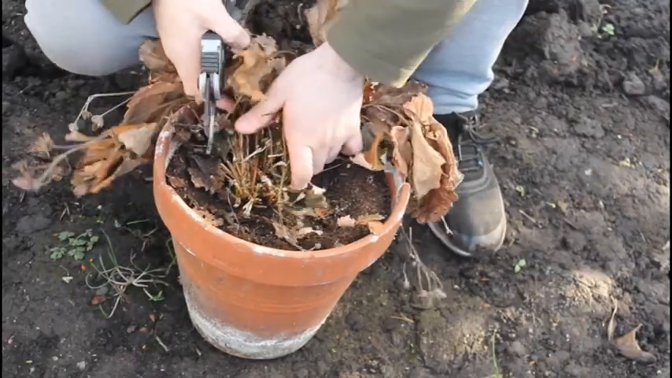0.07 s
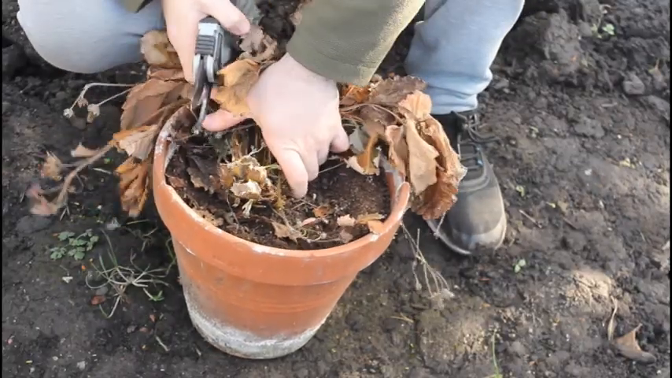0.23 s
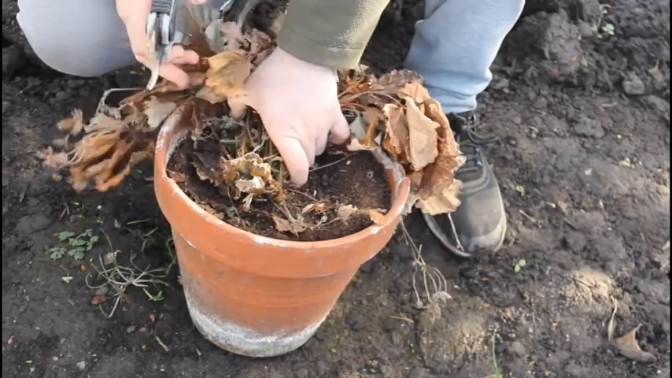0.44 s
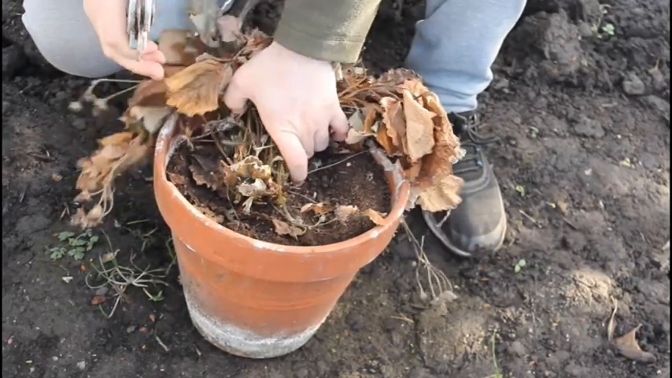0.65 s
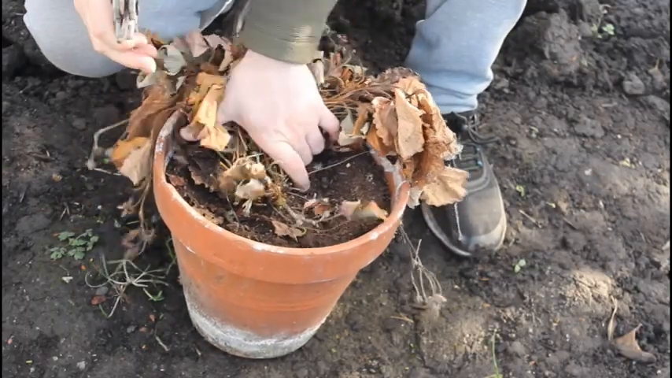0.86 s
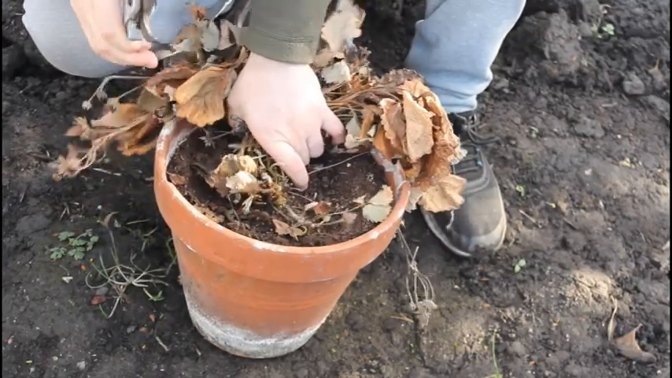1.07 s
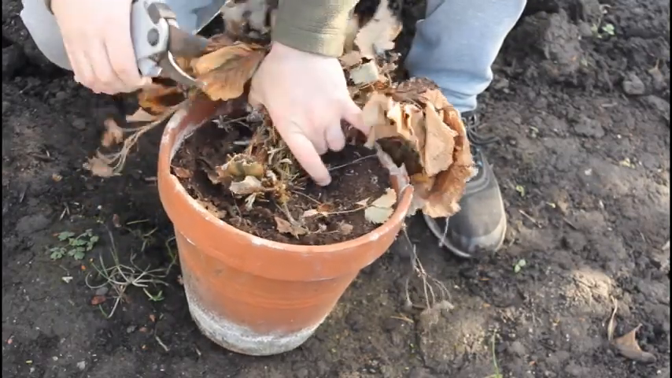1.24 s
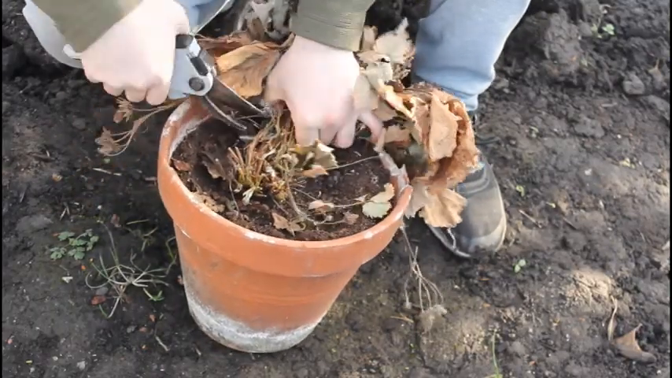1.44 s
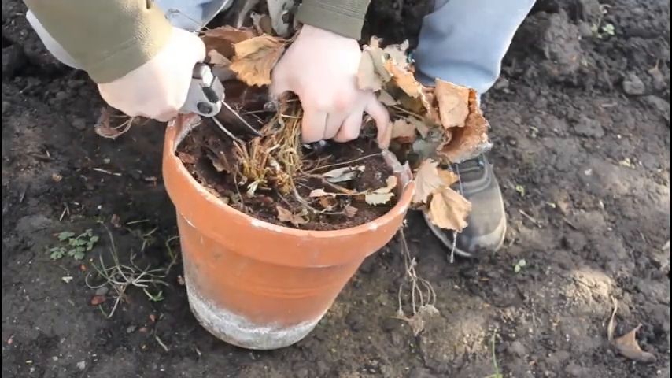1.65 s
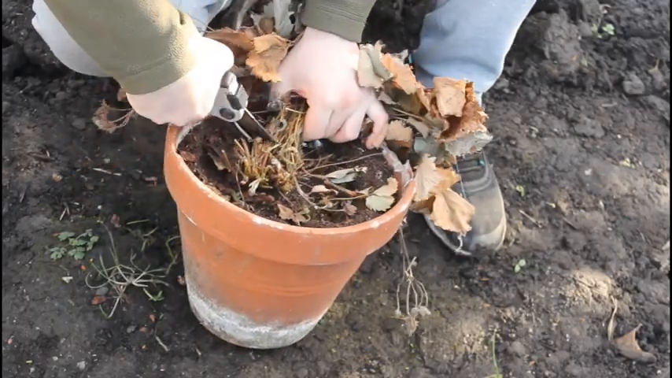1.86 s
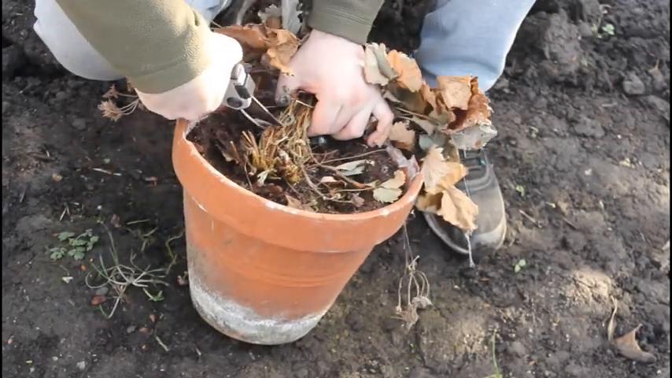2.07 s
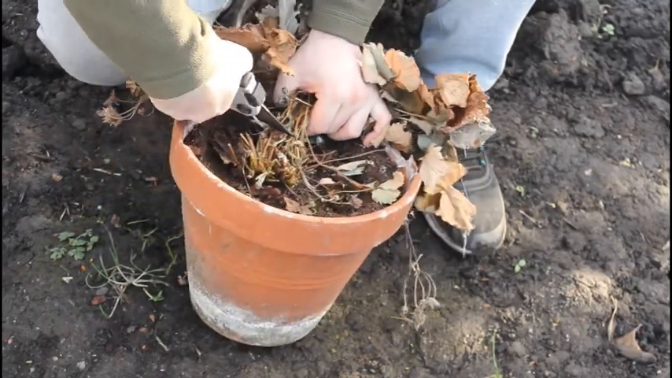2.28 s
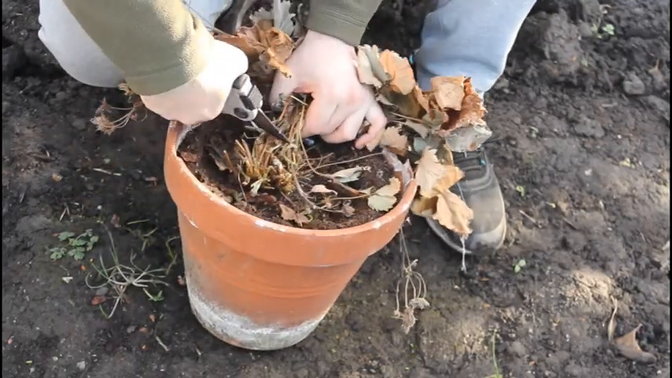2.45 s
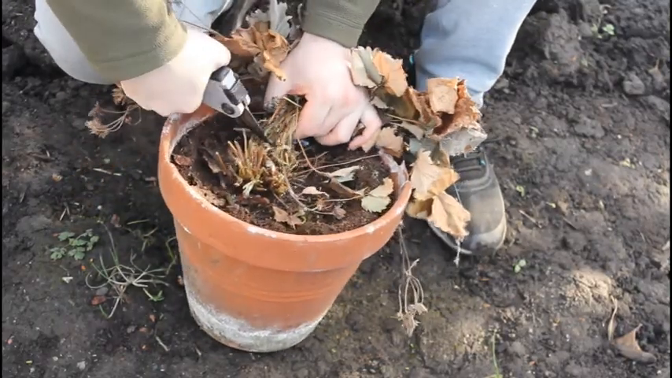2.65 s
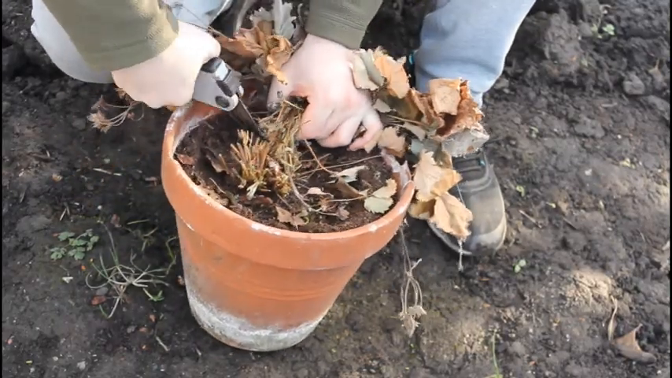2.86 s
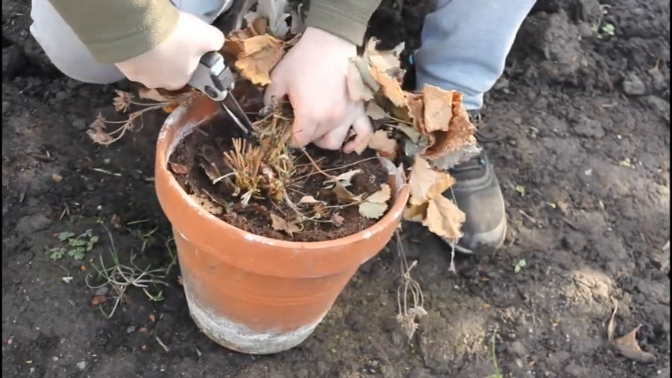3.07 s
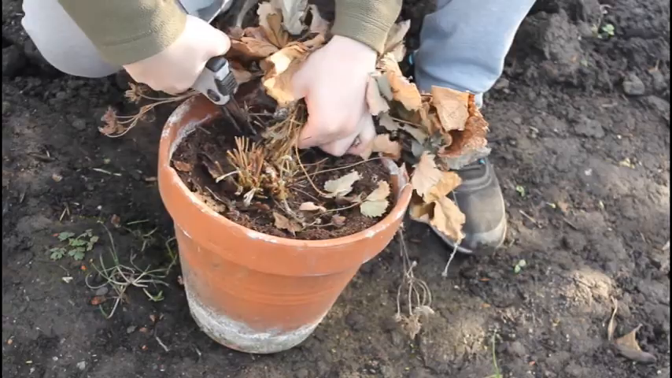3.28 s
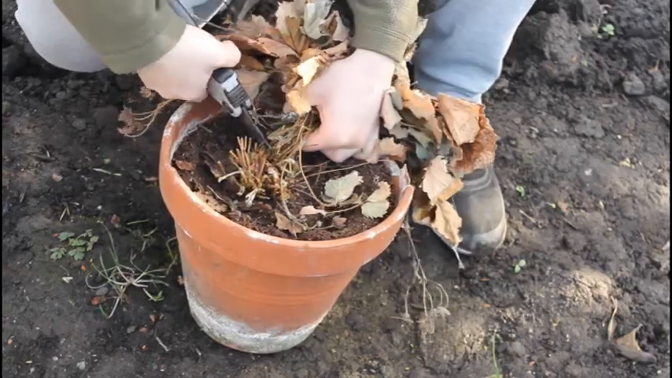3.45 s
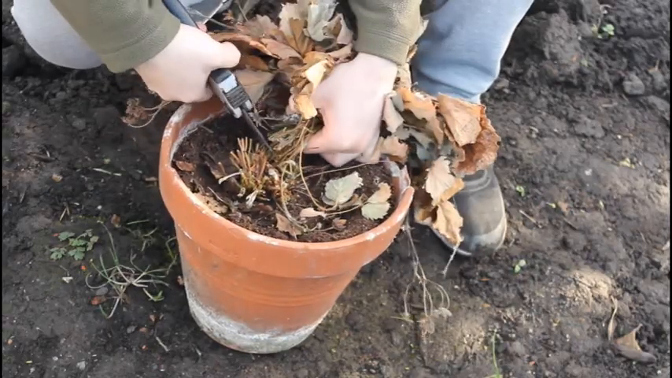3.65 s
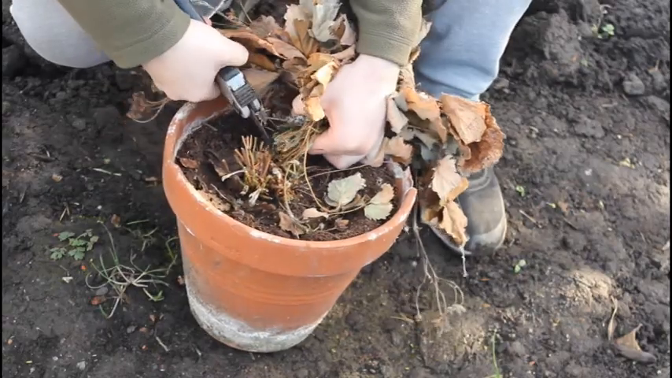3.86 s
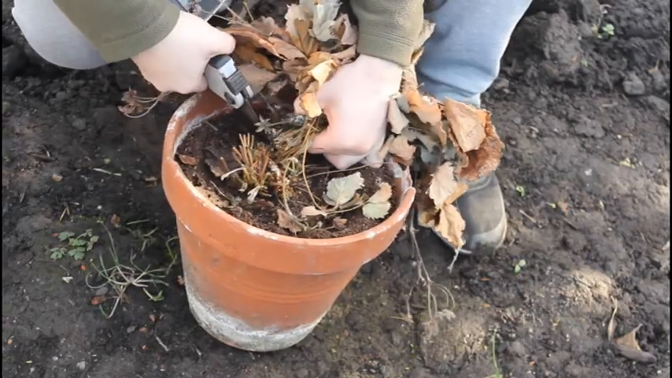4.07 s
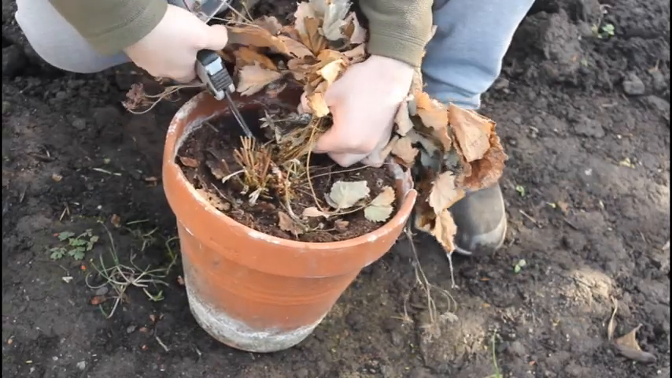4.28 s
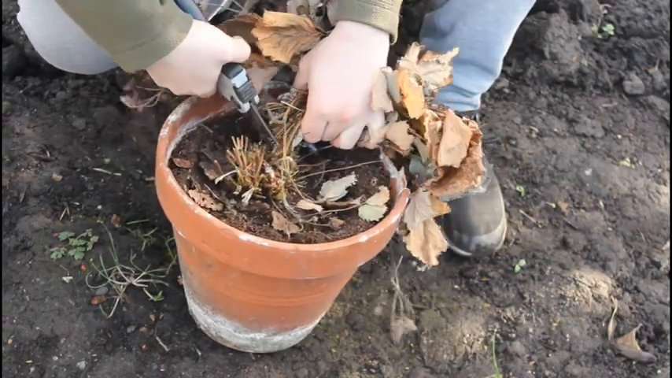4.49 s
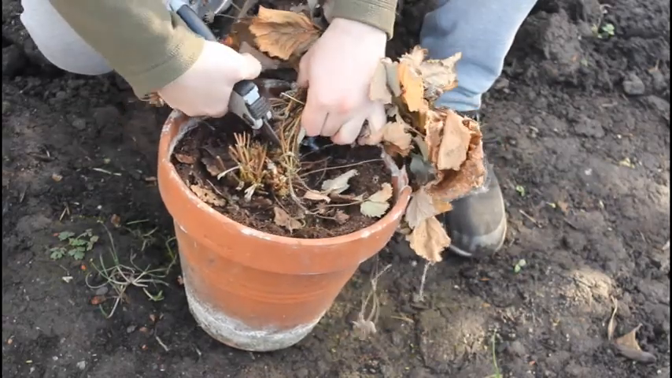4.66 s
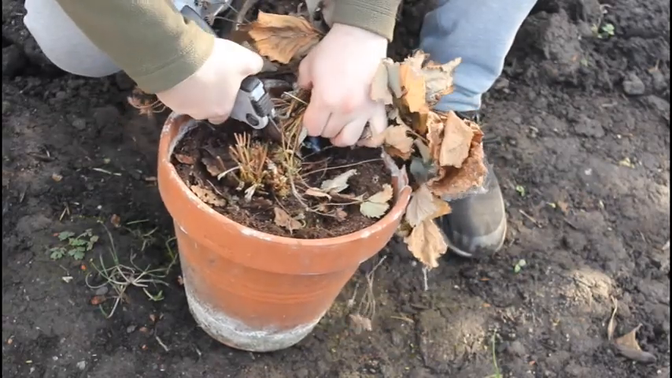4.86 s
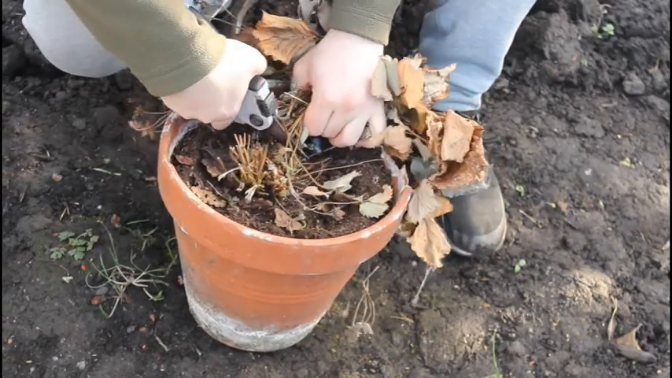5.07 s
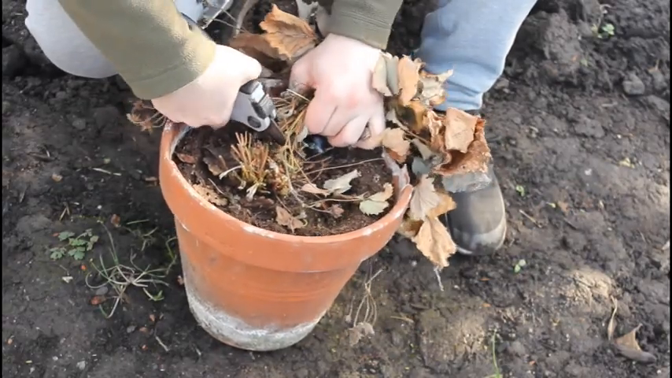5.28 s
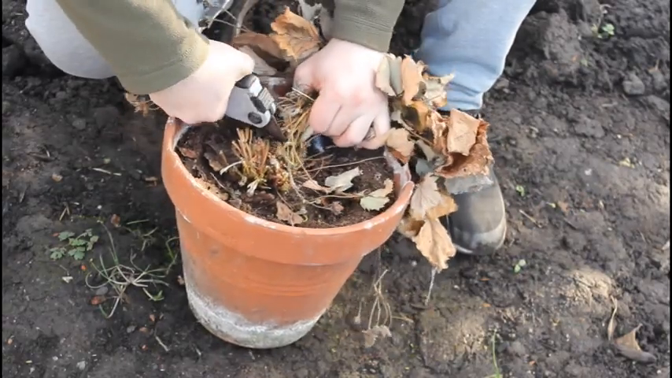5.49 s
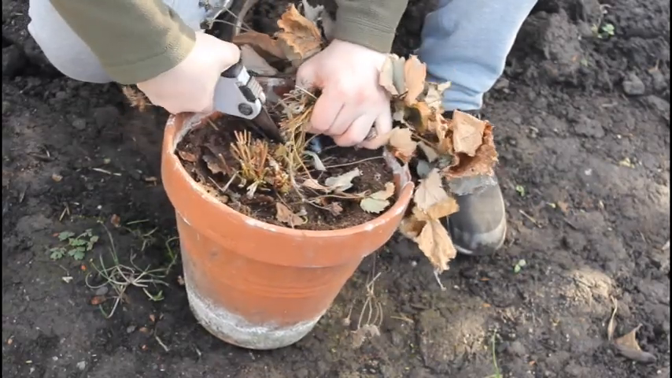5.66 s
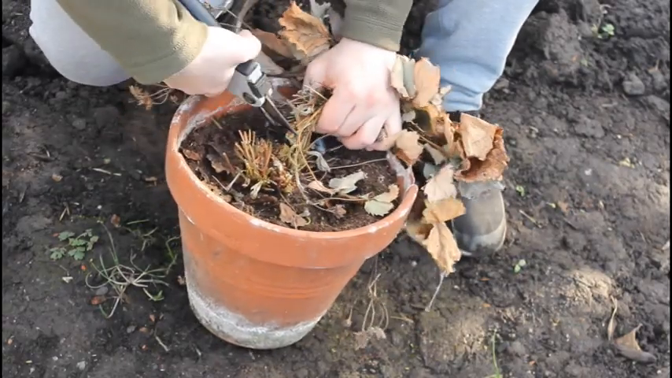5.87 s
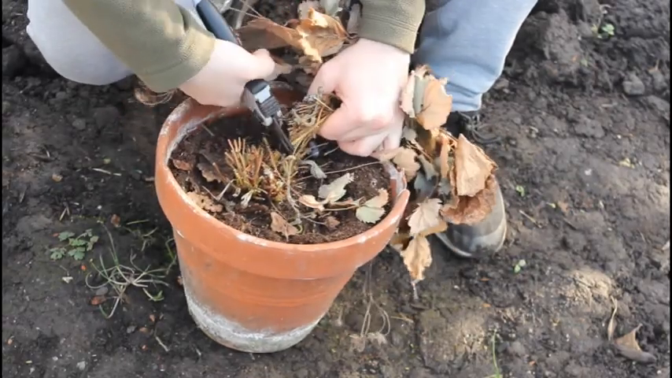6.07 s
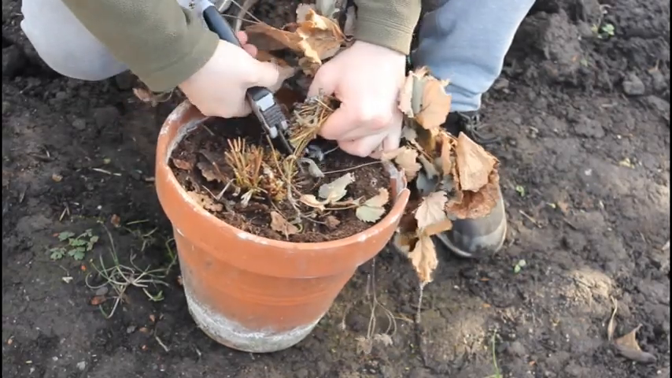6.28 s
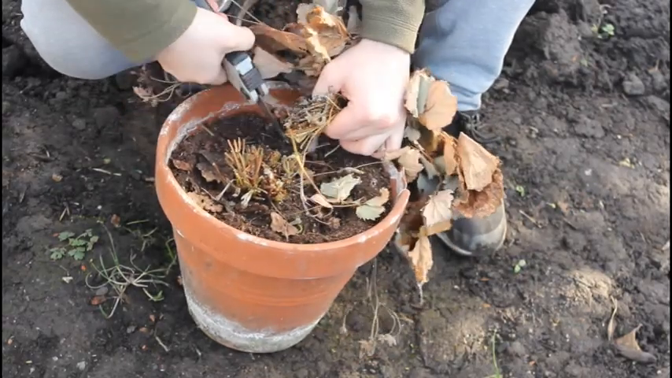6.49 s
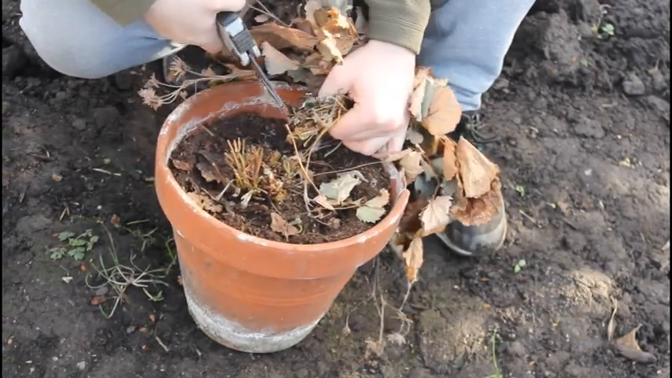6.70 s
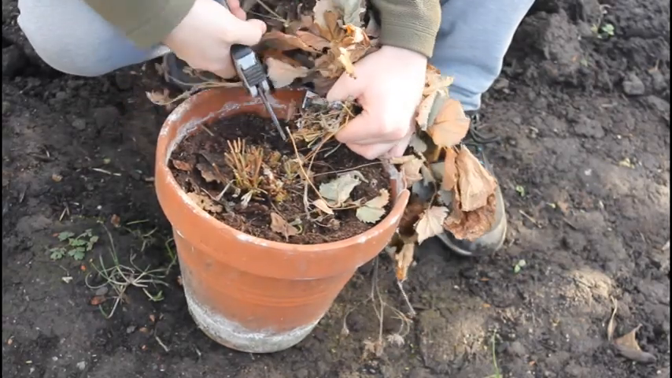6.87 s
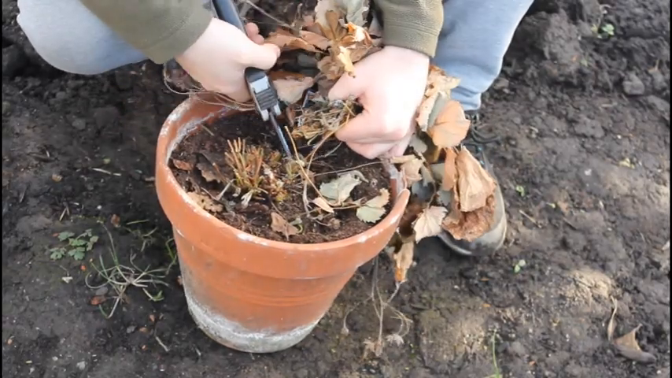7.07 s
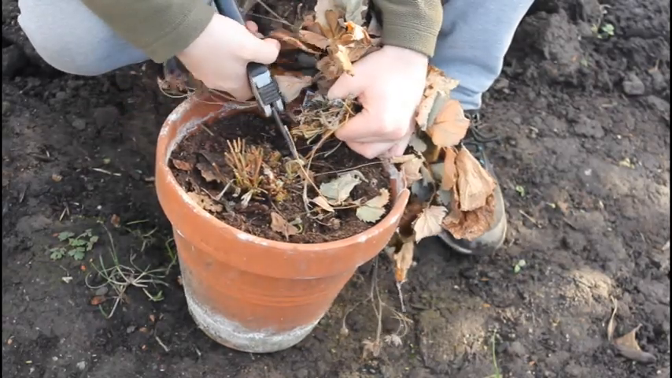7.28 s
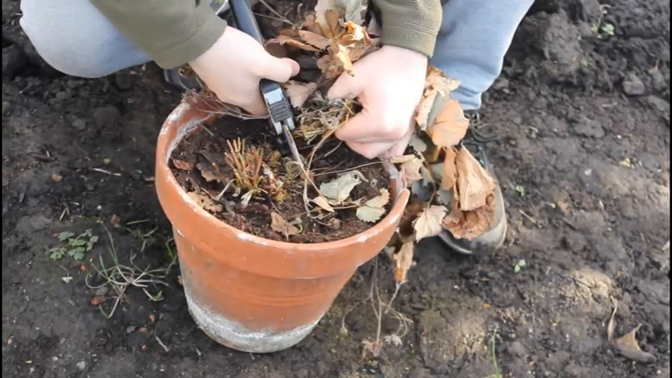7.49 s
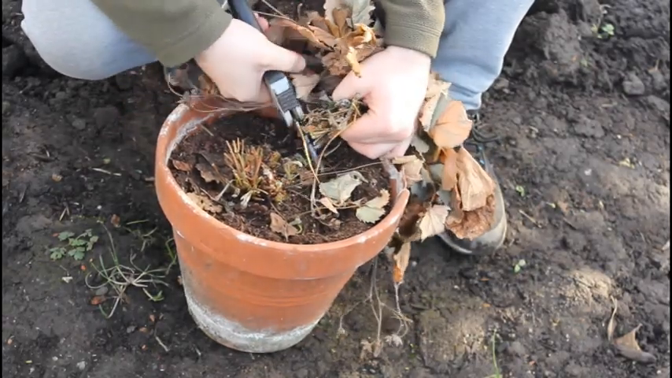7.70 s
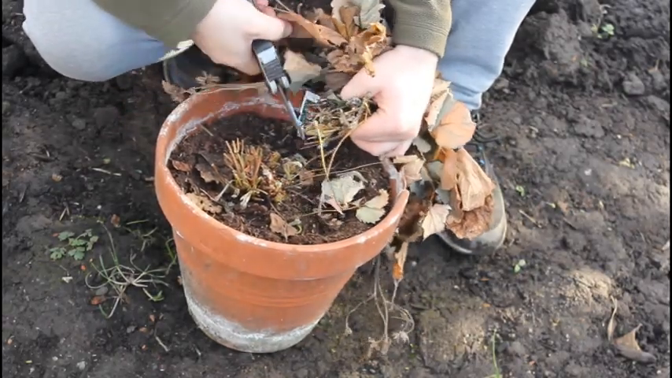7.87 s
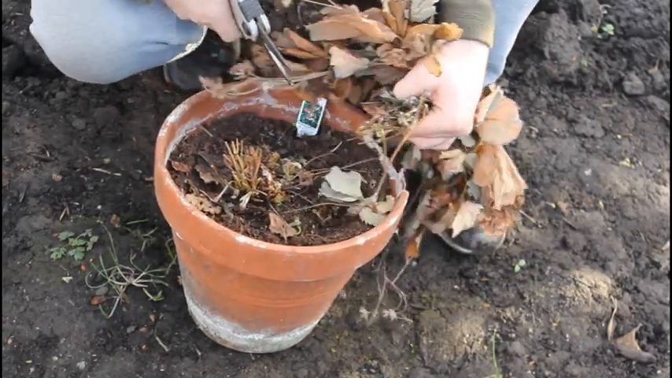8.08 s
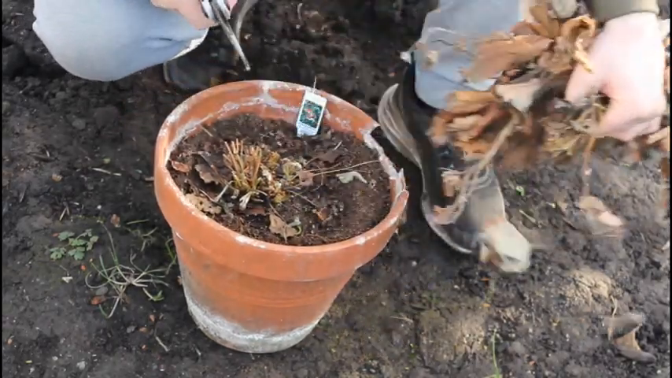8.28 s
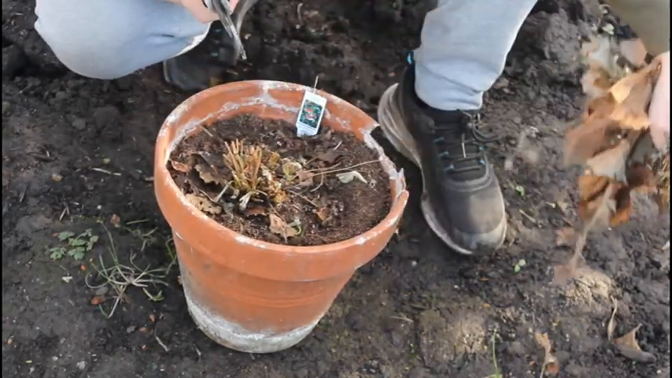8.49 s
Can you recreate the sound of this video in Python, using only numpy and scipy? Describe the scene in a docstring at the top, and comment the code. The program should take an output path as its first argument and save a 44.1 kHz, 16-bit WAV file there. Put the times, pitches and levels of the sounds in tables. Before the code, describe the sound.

Close outdoor sound of dry plant stems being pruned. Dead leaves rustle and crackle in uneven strokes throughout, busiest at first, with tiny brittle ticks from stalks. After almost three seconds the secateurs bite with a loud, abrupt snap; four more follow at irregular gaps of about one to one and a half seconds. Soft bumps, faint low rumble and hiss lie beneath; the garden is quiet and nearly echo-free.

```python
"""Secateurs cut five dry stems from a potted plant in a quiet garden, close to the microphone.
Each stem gives way in a few milliseconds: a burst of fractures rings the blades, swings stem and handles,
and overloads the recorder. Stalks tick as the blades close on them: short dying runs of fractures with a pitch.
One hand gathers the dead leaves: noise and clumped clicks, swelling with each stroke, rustle and crackle.
Below lie stubble cracks, dull bumps, a double click with a brief dip in level, outdoor rumble, hum and hiss."""
import sys
import numpy as np
from scipy import signal
from scipy.fft import rfft, irfft, next_fast_len
from scipy.io import wavfile

SR = 44100
rng = np.random.default_rng(int(sys.argv[2]) if len(sys.argv) > 2 else 0)


def log_audio(samples):
    """Write samples as a 16-bit WAV file to the path given in sys.argv[1]."""
    # one column per channel
    frames = np.atleast_2d(samples).T
    # limit to full scale, then quantise
    limited = np.clip(frames, -1, 1)
    pcm = np.round(limited * 32767).astype(np.int16)
    wavfile.write(sys.argv[1], SR, pcm)


N = 376613

# Source levels are those ahead of the scene's level curve, the overload and the treble cut.
# The hand sweeps through the leaves. Each row: start in seconds, rise in seconds, fall in seconds,
# peak rustle in dB before the layer trims, crispness as treble in dB relative to the rustle.
LEAF_STROKES = [(0, 0.022, 0.15, -43, 4), (.14, 0.11, .03, -46.5, 5), (.44, 0.075, 0.057, -44.5, -1.5),
                (.58, .09, .12, -48.5, 2.5), (.82, 0.2, 0.22, -42, -6.5), (1.149, 0.047, 0.15, -40.5, -1.5),
                (1.33, 0.13, 0.13, -44.5, -2), (1.56, 0.067, 0.042, -48, 1), (1.74, 0.036, 0.074, -43.5, 1),
                (1.82, .07, 0.37, -53, -2.5), (2.2, 0.14, 0.044, -50, -3), (2.63, 0.063, 0.033, -53, -1),
                (2.86, 0.094, 0.21, -54, -2), (3.08, 0.17, 0.3, -46, -0.5), (3.349, 0.11, 0.19, -48, -1),
                (3.69, 0.12, 0.079, -51, 0.5), (3.88, .03, .025, -46, -3), (3.97, 0.022, 0.27, -54.5, -1),
                (4.13, 0.023, 0.3, -49.5, -1.5), (4.32, 0.034, 0.19, -44, 1), (4.46, 0.066, 0.12, -48, -2),
                (4.63, 0.081, 0.047, -50.5, -4.5), (4.792, 0.041, 0.045, -45.5, -3.5),
                (4.9, 0.033, 0.35, -51.5, -5), (5.14, 0.033, .33, -53, -3), (5.489, 0.019, 0.063, -45, 3),
                (5.821, 0.15, 0.099, -45.5, -2), (6.08, 0.052, .1, -51, -3), (6.23, 0.089, .09, -50.5, 1.5),
                (6.43, .12, 0.14, -51.5, 0), (6.69, .12, 0.18, -47.5, 0.5), (6.92, 0.051, 0.062, -45, 1.5),
                (7.15, .03, 0.27, -51.5, -2), (7.35, 0.048, 0.15, -48, 0.5), (7.499, 0.086, .22, -44, 1.5),
                (7.69, 0.15, 0.15, -46, 0), (7.89, 0.22, 0.13, -42.5, 3.5)]
STROKE_EDGE_DB = -13   # a stroke at its start and at the end of its fall, relative to its peak
HELD_DB, HELD_SWING_DB, HELD_STIRS_PER_S = -64, 3, 9   # the held bundle never lies quite still
# Tone of sliding, crackling leaves. Each row: frequency in Hz, relative level in dB per Hz.
LEAF_COLOUR = [(50, -30), (110, -6.5), (200, 0.5), (370, 3), (580, 0.5), (790, -8.5), (1150, 1.5),
               (2100, 2), (2700, -4.5), (3300, 2), (4600, -3), (8000, -10), (13000, -15), (16000, -20)]
# How much the blades stir the stubble. Each row: time in seconds, level of the tiny cracks in dB before the pull.
STUBBLE_LEVEL = [(0, -56), (1.3, -56), (2.9, -55), (3.8, -50), (5.45, -53), (5.65, -62), (6.1, -52.5),
                 (8.15, -51), (8.3, -58)]
# Tone of the surroundings' reply. Each row: frequency in Hz, relative level in dB per Hz.
YARD_COLOUR = [(40, -4), (150, 6), (400, -2), (800, 1.5), (2000, 0.5), (5500, 6.5), (10000, 5),
               (16000, 9.5)]
# Tone of the outdoor rumble. Each row: frequency in Hz, relative level in dB per Hz.
AIR_COLOUR = [(25, -35), (60, -11), (110, -0.5), (170, 2.5), (320, -1.5), (700, -9), (1400, -8),
              (4000, -33.5), (16000, -16)]
# A faint low hum comes and goes. Each row: time in seconds, rms level in dB.
HUM_LEVEL = [(1.1, -86), (1.4, -72), (2.3, -69), (2.5, -114)]
AIR_DB, HISS_DB, HUM_HZ = -54.5, -57.5, 59.5   # rms levels of air and shared hiss, pitch of the hum
# A sharp double click. Each row: start in seconds, peak in dB before its high-pass.
CLICKS = [(0.215, -11), (0.2173, -8)]
# The level dips briefly after the double click. Each row: time in seconds, gain in dB.
LEVEL_DIP = [(.218, -1), (.224, -29), (.435, -14), (.455, -1)]
# Hands and tool on soil and pot. Each row: start in seconds, level in dB ahead of the swell, pitch in Hz.
BUMPS = [(0.89, -31, 132), (1.17, -22.5, 162), (2.658, -30, 257), (2.685, -25, 178), (2.767, -20.5, 147),
         (3.965, -20.5, 178), (4.055, -31, 298), (6.344, -17, 114)]
# The loudest stalks cracking. Each row: start in seconds, rms in dB before the ticks' shared lift,
# pitch in Hz, length in seconds, ringing share of the power from 0 to 1.
STALK_TICKS = [(0.9375, -27, 3550, 0.0026, 1), (0.979, -25, 1770, 0.0015, 0.65),
               (1.14, -29.5, 2120, 0.0012, 0.8), (1.1856, -26, 2390, 0.0018, 0.76),
               (1.769, -31, 9700, 0.0013, .5), (1.872, -32.5, 7900, 0.00049, 0.1),
               (2.044, -37.5, 9700, 0.0047, 0.3), (2.2366, -36.5, 6600, 0.0024, 0),
               (2.339, -35, 7100, .0016, .1), (2.44, -39.5, 4700, 0.0013, .8),
               (2.523, -32.5, 7500, 0.00062, 0.5), (2.589, -29.5, 3570, 0.00043, 0.75),
               (2.656, -31.5, 1800, 0.0024, 0.3), (2.6833, -24.5, 1910, 0.0026, 0.92),
               (2.692, -34, 1800, 0.0037, 0.5), (2.721, -30, 9700, 0.0012, 0.1),
               (2.8366, -35, 1830, 0.0021, .45), (3.127, -32, 3720, 0.00071, 1),
               (3.226, -37, 7500, 0.0031, 0.3), (3.377, -33, 7150, .0025, 0.5),
               (3.903, -36.5, 1670, 0.0072, 0.3), (3.946, -31, 4700, 0.0016, 0),
               (4.059, -33, 1630, 0.00073, 0.2), (4.167, -34.5, 3250, 0.0037, 1),
               (4.6894, -38.5, 5140, 0.0018, 1), (5.065, -35.5, 3430, 0.002, 0.9),
               (5.198, -35, 5600, 0.0012, .2), (5.3754, -32, 4190, 0.00084, .4),
               (5.428, -35, 5600, .0011, .4), (5.53, -25.5, 6300, 0.0013, 0.4),
               (5.708, -40, 3800, 0.0087, 0.01), (6.083, -29, 7200, 0.0038, 0.73),
               (6.133, -34, 6200, .0016, .6), (6.3065, -29, 4200, .0025, 0.2),
               (6.4397, -35, 3400, .0014, 0.14), (6.552, -36, 4050, 0.0028, 0.8),
               (6.791, -34.5, 3370, 0.0029, 0.6), (7.007, -34, 10900, 0.0028, 0.7),
               (7.069, -40.5, 1600, 0.0083, 0.12), (7.184, -38.5, 2750, .0014, 0.3),
               (7.416, -31.5, 1730, 0.0031, 0.1), (7.569, -35, 1500, 0.006, .5),
               (7.624, -28, 8200, .0016, 0.05), (7.872, -28, 3360, 0.0041, 0.8)]
# Stems giving way, most in two or three stages; pitches depend on the stem and on where the blades grip it.
# Each row: middle in seconds, crack rms in dB, length in seconds, stem pitch in Hz, stem level in dB,
# blade pitch in Hz, blade level in dB, thud pitch in Hz, thud level in dB, knock of the handles in dB.
STEM_SNAPS = [(2.7591, -22, 0.0025, 1880, -17, 3400, -36, 247, -22, -44),
              (2.7631, -4.5, 0.0022, 2200, -9.5, 3330, -13, 210, -18.5, -13.5),
              (3.9622, -3, 0.0019, 1857, -6, 4900, -14.5, 426, -13.5, -14),
              (5.5042, -2, 0.0012, 1910, -6.5, 5000, -32, 674, -20, -37),
              (5.5074, -6, 0.0022, 2320, -7, 4850, -9, 674, -12.5, -16.5),
              (6.34, -16.5, 0.0014, 1940, -21, 3300, -34, 450, -26.5, -39),
              (6.3441, -2, 0.0023, 2440, -8.5, 3560, -20, 283, -11, -10),
              (7.6396, -14, 0.0037, 3430, -19, 4430, -25, 397, -46, -39),
              (7.6461, -8, 0.002, 1520, -16.5, 6340, -12.5, 260, -29, -26),
              (7.6494, -12.5, 0.0017, 1110, -23, 3540, -13.5, 424, -20.5, -43)]
# Ring of the blades and the stem between them. Each row: frequency in Hz, width in Hz, relative level in dB.
BLADE_MODES = [(970, 490, -8), (1500, 1100, -11.5), (2200, 370, -5), (3140, 1200, -8), (4590, 230, 5.5),
               (5580, 740, -2), (7080, 1200, 0.5), (8760, 380, 2)]
# Tone shaping of the crack. Each row: frequency in Hz, relative gain in dB.
SNAP_COLOUR = [(150, -22), (700, -6.5), (2000, 1.5), (5000, -2), (8000, -6.5), (12000, -4), (16000, -5.5)]
# Swings of the handles. Each row: frequency in Hz, level in dB relative to the knock.
HANDLE_SWINGS = [(620, -5), (950, -0.5), (1400, -5.5)]
# Tone of the hiss shared by both channels. Each row: frequency in Hz, relative level in dB per Hz.
HISS_COLOUR = [(30, -20), (120, 12), (400, 1.5), (2000, 4.5), (16000, 0.5)]
# Tone of the hiss apart in each channel. Each row: frequency in Hz, relative level in dB per Hz.
CHANNEL_HISS_COLOUR = [(30, 9.5), (650, 9), (1500, -13), (6000, -12.5), (16000, 3.5)]
CUTOFF_HZ = 15950   # top of the recorder's treble


def from_db(db):
    """Decibels to gain."""
    return 10 ** (np.asarray(db) / 20)


def rms_one(x):
    """Scale to an rms of 1."""
    return x / np.sqrt(np.mean(x ** 2) + 1e-20)


def with_energy(x, seconds):
    """Scale x to the energy of a sound of rms 1 lasting that long."""
    return x * np.sqrt(seconds * SR / (np.sum(x ** 2) + 1e-20))


def in_time(rows):
    """Each column of a curve at every sample."""
    s, *columns = np.transpose(rows)
    return [np.interp(np.arange(N) / SR, s, column) for column in columns]


def coloured(x, spectrum):
    """Filter x with a smooth spectral curve; rms 1."""
    hz, db = np.transpose(spectrum)
    size = next_fast_len(len(x) + 512)
    bins = np.maximum(np.fft.rfftfreq(size, 1 / SR), 1)
    gain = from_db(np.interp(np.log(bins), np.log(hz), db))
    return rms_one(irfft(rfft(x, size) * gain, size)[:len(x)])


def band(x, edges_hz, kind, order=3):
    """Butterworth filter."""
    sections = signal.butter(order, np.minimum(edges_hz, SR / 2 - 10), kind, fs=SR, output="sos")
    return signal.sosfilt(sections, x)


def resonance(x, hz, width_hz):
    """Two-pole resonance with a gain of about 1 at its peak."""
    r = np.exp(-np.pi * width_hz / SR)
    feed = np.array([1, 0, -1]) * (1 - r * r) / 2
    poles = [1, -2 * r * np.cos(2 * np.pi * hz / SR), r * r]
    return signal.lfilter(feed, poles, x + 1e-18)


def drift(rate):
    """Slow chance: straight lines between random knots of spread 1, rate knots a second."""
    knots = rng.standard_normal(N // 20)
    return np.interp(np.arange(N) * rate / SR, np.arange(len(knots)), knots)


def fractures(per_s, spread_db, size):
    """Random clicks of either sign, most small and a few large."""
    size_db = spread_db * np.minimum(rng.exponential(1, size), 3.5)
    strength = from_db(size_db) * rng.choice([-1, 1], size)
    return strength * (rng.random(size) < per_s / SR)


def add(out, s, sound):
    """Mix a sound in from time s."""
    at = round(s * SR)
    out[at:at + len(sound)] += sound[:N - at]


def handling():
    """Strokes swell and fade over the stir of the held bundle; returns the gains of rustle and treble."""
    t = np.arange(0, N, 50) / SR   # a coarse clock is enough for slow swells
    rustle = treble = 0
    for s, rise, fall, db, crisp_db in LEAF_STROKES:
        from_peak = t - (s + rise)
        away = np.minimum((from_peak / np.where(from_peak < 0, rise, fall)) ** 2, 10)
        swell = from_db(db + STROKE_EDGE_DB * away)
        rustle = rustle + swell ** 2   # strokes add as powers
        treble = treble + (from_db(crisp_db) * swell) ** 2
    held = from_db(HELD_DB + HELD_SWING_DB * drift(HELD_STIRS_PER_S))
    return [np.sqrt(power + held ** 2) for power in in_time(np.transpose([t, rustle, treble]))]


def crackle(per_s, spread_db, clump_db, grain_q=4.1, raw_db=-9):
    """Dry leaves buckle in clumps of tiny clicks, each ringing a small patch of leaf for a few cycles."""
    grains = fractures(per_s * from_db(clump_db * drift(70)), spread_db, size=N)
    pitches = np.geomspace(1300, 14000, 14)   # Hz
    dealt = rng.integers(0, len(pitches), N)   # which pitch each click rings
    rings = sum(resonance(grains * (dealt == k), hz, hz / grain_q) for k, hz in enumerate(pitches))
    return rms_one(rings + from_db(raw_db) * grains)


def leaves(slide_db=-3.5, crackle_db=-1, body_db=-51, body_follows=0.73, rustle_db=3.5, crisp_db=2.0,
           flutter_db=2.15):
    """Leaves slide and crackle; light brushing is crisp, squeezed bundle and sleeves add a steadier body."""
    rustle, treble = handling()
    slide = from_db(slide_db) * rng.standard_normal(N)
    crackling = from_db(crackle_db) * crackle(per_s=4200, spread_db=4.0, clump_db=5.5)
    sound = coloured(slide + crackling, LEAF_COLOUR) * from_db(flutter_db * drift(90))
    low = from_db(body_db) * rms_one(rustle ** body_follows) * rms_one(band(sound, 820, "low"))
    middle = from_db(rustle_db) * rustle * rms_one(band(sound, [850, 5500], "band"))
    high = from_db(crisp_db) * treble * rms_one(band(sound, 7070, "high"))
    return low + middle + high


def stubble(per_s=180, spread_db=2.5, follows=0.22):
    """Sparse, sharp little cracks from dry stumps around the blades, stronger while leaves are pulled."""
    cracks = crackle(per_s=per_s, spread_db=spread_db, clump_db=3, grain_q=4.3, raw_db=-7)
    pull = rms_one(handling()[0] ** follows)
    level = from_db(in_time(STUBBLE_LEVEL)[0])
    return level * pull * rms_one(band(cracks, [1500, 11000], "band", order=1))


def yard(x, near_db=-19, near_s=0.0072, far_db=-27, far_s=0.046):
    """Pot, legs and ground scatter the sound almost at once; a faint tail returns from farther off."""
    t = np.arange(SR // 4) / SR
    scatter = coloured(rng.standard_normal(len(t)), YARD_COLOUR) * (1 - np.exp(-t / 0.0024))
    near = with_energy(scatter * np.exp(-t / near_s), 1 / SR)
    far = with_energy(scatter * np.exp(-t / far_s), 1 / SR)
    return signal.fftconvolve(x, from_db(near_db) * near + from_db(far_db) * far)[:N]


def air():
    """Quiet outdoor rumble of shaped noise, with a faint sine hum."""
    hum_wave = np.sqrt(2) * np.sin(2 * np.pi * HUM_HZ * np.arange(N) / SR)
    hum = from_db(in_time(HUM_LEVEL)[0]) * hum_wave
    return from_db(AIR_DB) * coloured(rng.standard_normal(N), AIR_COLOUR) + hum


def clicks(decay_s=0.000082):
    """Bare downward spikes with an exponential decay, high-passed."""
    out, t = np.zeros(N), np.arange(SR // 100) / SR
    for s, db in CLICKS:
        add(out, s, -from_db(db) * np.exp(-t / decay_s))
    return band(out, 140, "high", order=2)


def bumps(decay_s=0.0028):
    """Soft contacts swell and die within a few cycles."""
    out, t = np.zeros(N), np.arange(SR // 10) / SR
    swell = t / decay_s * np.exp(-t / decay_s)   # tops out at 0.37
    for s, db, hz in BUMPS:
        add(out, s, from_db(db) * np.sin(2 * np.pi * hz * t) * swell)
    return band(out, 76, "high", order=2)


def ticks(lift_db=1, ring_q=6.1):
    """A stalk cracks in a short dying run of fractures and rings at its own pitch."""
    out, t = np.zeros(N), np.arange(SR // 30) / SR
    for s, db, hz, length, ringing in STALK_TICKS:
        run = fractures(18000, 2.0, size=len(t)) * np.exp(-t / (0.88 * length))
        dull = rms_one(band(run, [1300, 12500], "band", order=1))
        ring = rms_one(resonance(run, hz, hz / ring_q))
        crack = np.sqrt(1 - ringing) * dull + np.sqrt(ringing) * ring
        add(out, s, from_db(db + lift_db) * with_energy(crack, length))
    return out


def snaps(crush_db=-20, crush_s=0.005, raw_db=-5):
    """Fibres fail one by one, then all at once; the avalanche rings the blades and swings stem and handles."""
    out, t = np.zeros(N), np.arange(-SR // 25, SR // 25) / SR
    for s, db, length, stem_hz, stem_db, blade_hz, blade_db, thud_hz, thud_db, knock_db in STEM_SNAPS:
        avalanche = np.exp(-np.pi / 2 * (t / length) ** 2)
        crush = from_db(crush_db) * np.exp(-abs(t) / crush_s)   # scattered fibres before and after
        fibres = fractures(24000, 0.63, size=len(t)) * (avalanche + crush)
        blades = sum(from_db(mode_db) * resonance(fibres, hz, width) for hz, width, mode_db in BLADE_MODES)
        crack = coloured(blades + from_db(raw_db) * fibres, SNAP_COLOUR)
        sound = from_db(db) * with_energy(crack, length)
        # stem and tool are gripped so tightly that they swing only while the fibres break
        swings = [(stem_hz, stem_db), (blade_hz, blade_db), (thud_hz, thud_db)]
        swings += [(hz, knock_db + mode_db) for hz, mode_db in HANDLE_SWINGS]
        for hz, swing_db in swings:
            swing = avalanche * np.sin(2 * np.pi * (hz * t + rng.random()))
            sound += from_db(swing_db) * with_energy(swing, length)
        add(out, s + t[0], sound)
    return band(out, 83, "high", order=2)


def scene():
    """Everything is straight ahead, alike in both channels; the level curve spares only the clicks."""
    cuts = snaps() + ticks() + stubble() + bumps()
    garden = cuts + yard(cuts) + leaves() + air()
    level = from_db(in_time(LEVEL_DIP)[0])
    return np.tile(garden * level + clicks(), (2, 1))


def record(dry, channel_hiss_db=-65, top=1.05):
    """Microphone hiss is added, some of it apart in each channel; the snaps overload, the top is cut."""
    hiss = from_db(HISS_DB) * coloured(rng.standard_normal(N), HISS_COLOUR)
    apart = np.array([coloured(white, CHANNEL_HISS_COLOUR) for white in rng.standard_normal((2, N))])
    x = dry + hiss + from_db(channel_hiss_db) * apart
    overloaded = x / (1 + (x / top) ** 4) ** (1 / 4)   # bends smoothly towards the top
    treble_cut = signal.ellip(10, .1, 70, CUTOFF_HZ, fs=SR, output="sos")
    return signal.sosfilt(treble_cut, overloaded)


dry = scene()
out = record(dry)
log_audio(out)
```